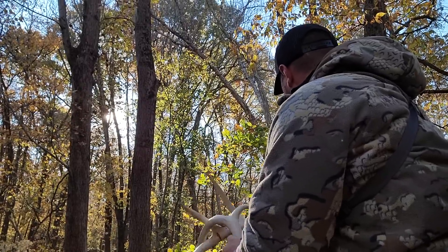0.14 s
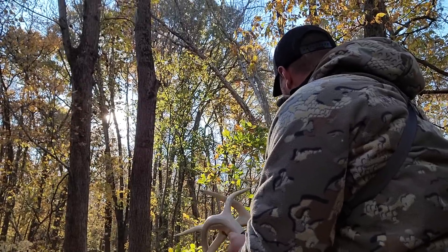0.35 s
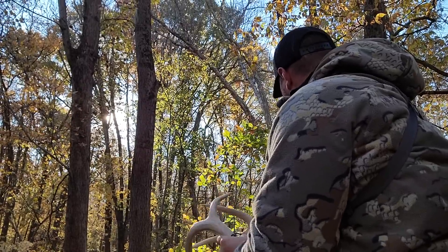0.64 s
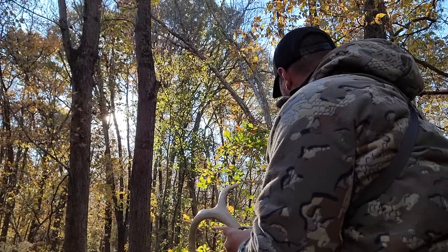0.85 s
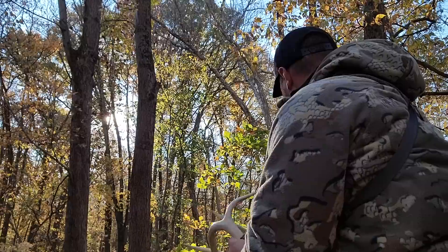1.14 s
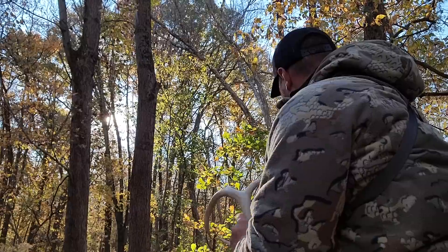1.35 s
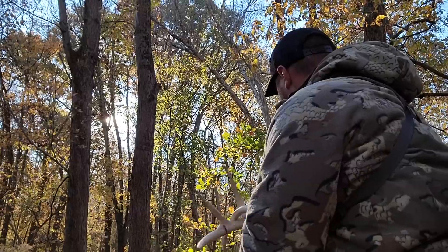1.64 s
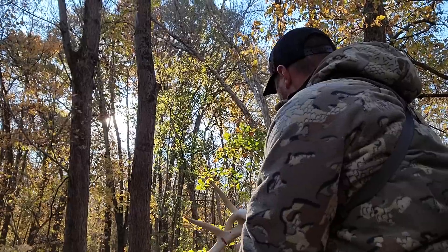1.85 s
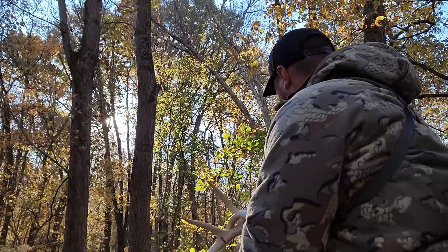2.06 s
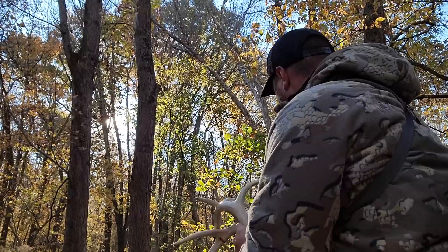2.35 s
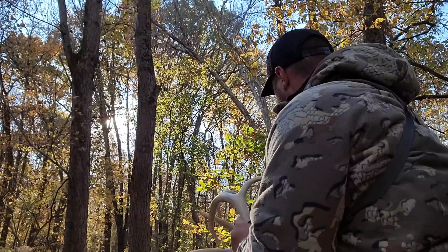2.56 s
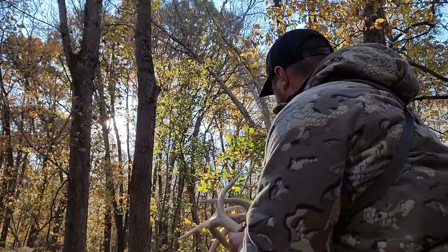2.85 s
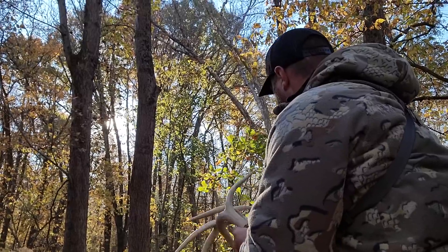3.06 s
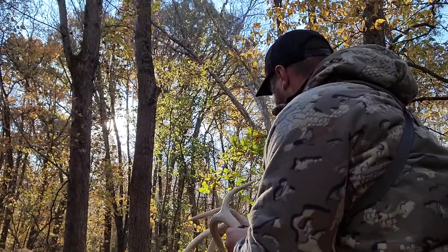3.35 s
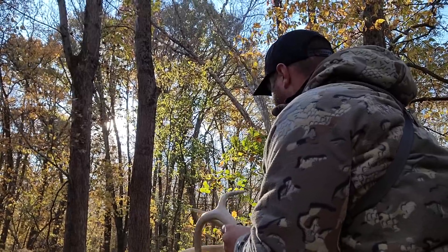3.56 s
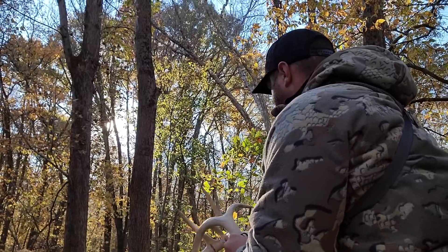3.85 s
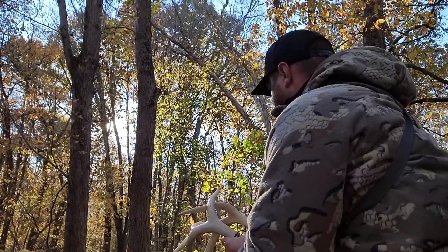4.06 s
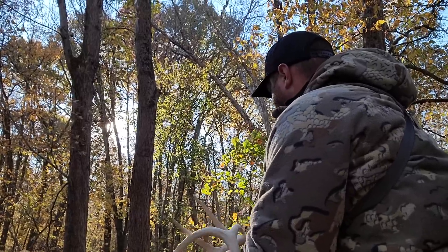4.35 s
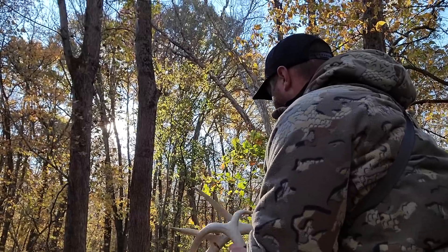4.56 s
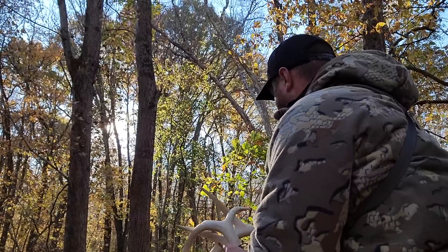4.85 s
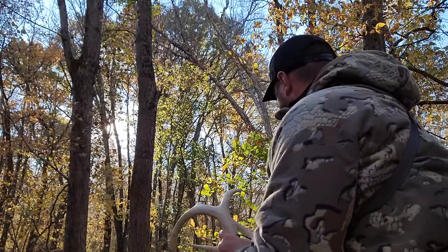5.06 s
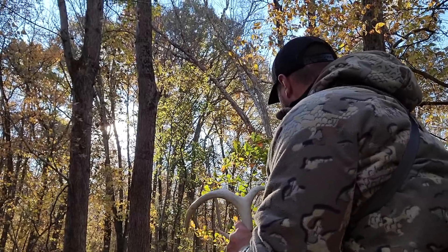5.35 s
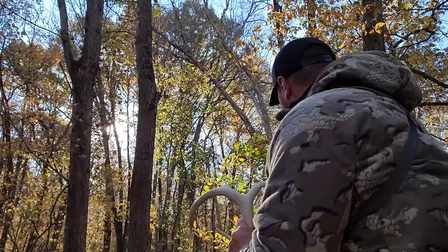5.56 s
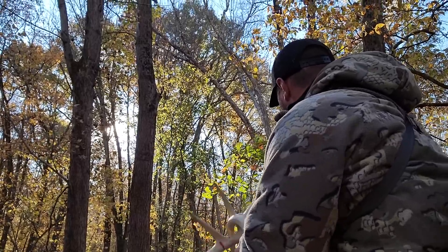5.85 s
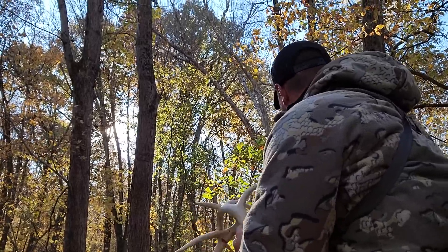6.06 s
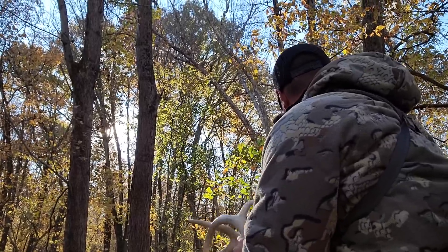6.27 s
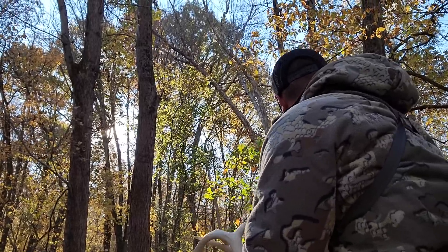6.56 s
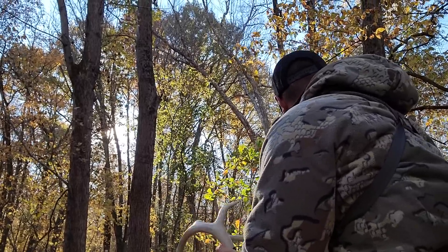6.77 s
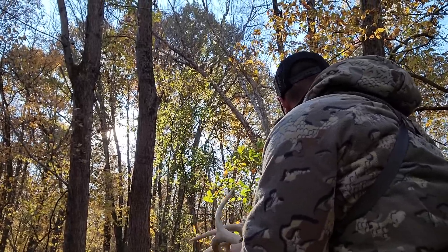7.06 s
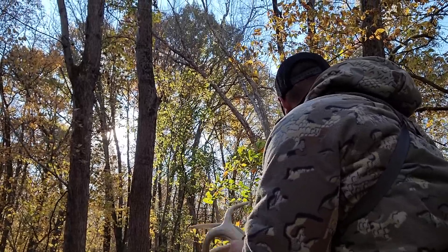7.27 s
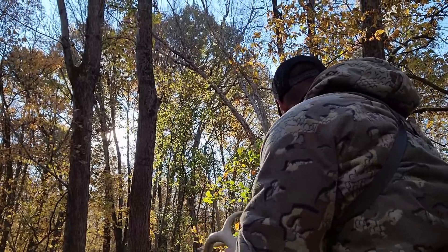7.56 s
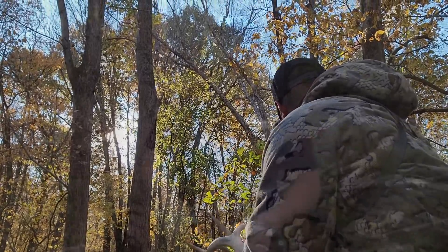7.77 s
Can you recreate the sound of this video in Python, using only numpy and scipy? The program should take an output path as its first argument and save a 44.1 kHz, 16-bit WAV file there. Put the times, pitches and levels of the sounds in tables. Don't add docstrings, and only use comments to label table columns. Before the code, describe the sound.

A pair of hard antlers is rattled about a metre from a small stereo microphone in open woods. Tight clusters of bright cracks, hollow clonks and brief gritty scrapes alternate with pauses holding only faint ticks. The loudest bursts come near the middle-late part and close to the end. Soft leaf hiss, distant low rumble and light wind sit underneath, with a very short diffuse return from the trunks.

```python
import sys
import numpy as np
from scipy import signal
from scipy.fft import rfft, irfft, next_fast_len
from scipy.io import wavfile

SR = 44100
rng = np.random.default_rng(int(sys.argv[2]) if len(sys.argv) > 2 else 0)


def wav_record(signal):
    frames = np.transpose(np.atleast_2d(signal))
    bounded = np.clip(frames, -1, 1)
    quanta = np.round(bounded * 32767).astype(np.int16)
    wavfile.write(sys.argv[1], SR, quanta)


def gain_from_db(level_db):
    decades = np.asarray(level_db, float) / 20
    return 10 ** decades


N = 348478

# f/Hz, level/dB [dB per Hz]
WOOD = [(12, -44), (20, -4), (69, -3), (200, -14.5), (381, -14), (533, -17.5), (1510, -20.5), (3910, -16),
        (5950, -25), (7250, -25), (9330, -38.5), (12700, -34), (14500, -42.5), (17500, -42.5)]
# f/Hz, likeness [-1 to 1]
LIKENESS = [(60, 0.25), (180, -0.015), (550, 0.54), (1650, -0.27), (4970, -0.17), (15000, 0.29)]
# t/s, level/dB
BREEZE = [(0, -59.5), (2.0, -60.5), (3.4, -65), (5.4, -63.5), (6.5, -64.5), (7.9, -58.5)]
# t/s, rise [dB], half length [s]
PUFFS = [
    (3.65, 16.5, 0.042),
    (6.039, 13.5, 0.14),
    (7.441, 6, 0.032),
]

# f/Hz, level/dB, T60 [s]
BEAM_MODES = [(208, -13.5, 0.1), (262, -8, 0.059), (348, -11, 0.11), (410, -6.5, 0.068), (527, -3, 0.083),
              (728.8, -11.5, 0.011), (834, 4.5, 0.0478)]
# f/Hz, level/dB, T60 [s]
TINE_MODES = [(976, -6.5, 0.01652), (1180, -11.5, 0.0597), (1440, -1.5, 0.0307), (1650, -2, 0.01653),
              (1795, -1.5, 0.0264), (2150, -9, 0.023), (2512, -7.5, 0.0299), (2772, -6.5, 0.019),
              (2970, -5.5, 0.022), (3180, -4, 0.00843), (3420, -9.5, 0.035), (3750, -8, 0.0193),
              (4270, -10, 0.01), (4580, -7.5, 0.031), (5000.6, 5, 0.016), (5830, -8, 0.019),
              (6670, 7, 0.0059), (7360, -0.5, 0.00917), (8700, -4, 0.0055), (9170, -8, 0.0045),
              (12400, 1.5, 0.0032), (13800, -4, 0.002)]

# t/s, peak level/dB, strongest ring f/Hz
THUDS = [(0.0, -39.5, 567), (.046, -40.5, 526), (.152, -43, 590), (.177, -40.5, 414), (1.011, -51.5, 396),
         (1.053, -45, 500), (1.474, -31, 826), (1.501, -25, 514), (1.531, -35, 380), (1.558, -36.5, 422),
         (2.143, -33, 790), (2.76, -46.5, 489), (2.805, -34, 930), (2.844, -38.5, 400), (2.915, -43.5, 870),
         (3.064, -36, 837), (3.961, -37, 821), (4.33, -55, 355), (4.37, -47.5, 370), (4.397, -45.5, 438),
         (5.768, -27, 870), (5.795, -27, 350), (5.828, -37.5, 370), (5.855, -41, 550), (5.885, -33, 850),
         (5.99, -38, 736), (6.314, -32, 839), (6.938, -25, 358), (6.99, -41.5, 490), (7.102, -45, 700)]
# t/s, peak level/dB, strongest ring f/Hz, slide fade [s]
SNAPS = [
    (1.056, -6.5, 3625, 0.002),
    (1.4091, -6, 3690, 0.0037),
    (3.631, -13, 3180, .0044),
    (5.71, -38.5, 2150, .0093),
    (5.7216, -3, 2313, 0.002),
    (5.743, -12, 3195, .0082),
]
# t/s, peak level/dB, strongest ring f/Hz, slide fade [s]
CRACKS = [(1.0109, -10, 3420, 0.0031), (1.0304, -19, 3450, 0.014), (1.448, -7, 3750, 0.0042),
          (2.7598, -14.5, 3600, 0.0035), (2.8048, -4, 1650, 0.012), (3.0752, -13, 3220, 0.0041),
          (3.6413, -2.5, 3167, 0.005), (5.7701, -8, 2970, 0.0056), (6.9297, -11.5, 3920, 0.003),
          (6.9378, -3, 1500, 0.012), (6.9772, -7.5, 4180, 0.0034), (6.991, -17.5, 1730, 0.0096),
          (7.2603, -16, 2720, 0.004), (7.284, -28.5, 4190, .0015), (7.5447, -6, 3120, 0.0046),
          (7.598, -31, 3190, 0.004), (6.291, -10.5, 3190, 0.0045), (6.3138, -12.5, 3020, 0.005),
          (7.7867, -17.5, 2870, 0.0043)]
# t/s, peak level/dB, strongest ring f/Hz, slide fade [s]
CLACKS = [(0.1666, -15, 1560, 0.0072), (0.1787, -17.5, 1340, 0.0052), (.192, -24, 1750, 0.0035),
          (1.135, -27.5, 2180, 0.0029), (1.475, -4.5, 2790, 0.0027), (3.0636, -4.5, 3240, 0.0071),
          (3.4194, -12, 2620, 0.0032), (3.937, -5.5, 3260, 0.0031), (3.9613, -6, 4000, 0.0019),
          (4.024, -28, 2230, 0.0037), (4.3984, -29, 2000, 0.0082), (5.7855, -13, 3440, 0.013),
          (5.797, -3, 1760, 0.0022), (5.9895, -19, 2970, 0.0051), (6.324, -8.5, 2680, 0.0098),
          (7.417, -16.5, 1780, 0.0044), (7.5282, -15, 4040, 0.004), (7.8073, -20, 3080, 0.0087)]
# t/s, peak level/dB, strongest ring f/Hz, slide fade [s]
CLONKS = [(.0002, -17.5, 1100, 0.0082), (0.0251, -24, 1060, 0.0071), (.101, -36, 1940, 0.0032),
          (0.1529, -10.5, 2740, 0.0027), (1.0707, -21.5, 2810, 0.0065), (1.4937, -18.5, 3315, 0.0028),
          (2.138, -36, 2700, 0.0089), (2.146, -11, 2870, 0.0092), (2.8327, -13.5, 3100, 0.0037),
          (2.9196, -35, 1060, 0.011), (3.043, -19, 3150, 0.0062), (3.055, -8, 3110, 0.0042),
          (3.6536, -20, 3300, .008), (3.7005, -27.5, 3470, 0.0077), (4.3468, -28, 4120, 0.011),
          (5.854, -25.5, 2970, 0.0046), (5.8847, -27, 1460, 0.0015), (7.008, -10, 1845, 0.00795),
          (7.1642, -32, 1700, 0.011), (7.2164, -35, 1800, 0.016)]
# t/s, peak level/dB, strongest ring f/Hz, slide fade [s]
BUMPS = [(0.035, -37, 1050, 0.0067), (0.0438, -29, 3040, 0.0082), (0.1102, -36.5, 1850, 0.0086),
         (1.534, -34, 2530, .007), (1.5465, -28, 1133, 0.003), (1.588, -28.5, 1470, 0.0041),
         (1.7153, -23.5, 2040, 0.0017), (2.842, -16, 3480, 0.01), (2.955, -36, 1430, 0.0054),
         (3.2619, -28.5, 1950, 0.0057), (3.289, -28, 1650, 0.004), (3.3443, -25, 3630, 0.007),
         (3.438, -27, 1760, 0.0047), (5.8954, -33, 2410, 0.014), (6.0045, -23, 1630, 0.0044),
         (6.0162, -25.5, 1620, 0.0018), (7.0409, -20.5, 1700, 0.0073), (7.101, -22.5, 1640, 0.0034),
         (7.113, -28.5, 1770, 0.0074), (7.1419, -27.5, 1660, 0.0072), (7.1814, -33, 1760, 0.0094),
         (7.209, -38, 1820, .0033), (7.802, -28.5, 2820, 0.0062), (1.501, -5, 3420, 0.0025),
         (4.3711, -18.5, 1856, 0.0048)]
# t/s, peak level/dB, strongest ring f/Hz, slide fade [s]
PINGS = [
    (3.5321, -31, 3560, 0.0061),
    (3.9538, -8.5, 3076, 0.005),
    (4.3306, -11, 2910, 0.0051),
    (7.2473, -7.5, 2960, 0.0036),
    (7.566, -17.5, 3680, 0.0083),
    (7.82, -31, 2870, 0.0021),
]
# level/dB of modes under 2 kHz, level/dB of modes over 5 kHz
CONTACT_DB = [
    (-9, -1),
    (-9, -8.5),
    (-8, -14),
    (-2.5, -12.5),
    (0, -26),
    (-15.5, -11.5),
]
# t/s, peak level/dB, strongest ring f/Hz, slide fade [s]
TAPS = [(0.542, -48, 1940, 0.015), (0.59, -50, 2560, 0.006), (1.1558, -43, 1756, 0.008),
        (2.442, -41, 1630, 0.017), (2.456, -39, 1600, 0.009), (2.912, -33, 1164, 0.0065),
        (2.941, -34.5, 1180.0, 0.012), (2.961, -41.5, 1720, 0.0036), (3.2747, -40, 1720, 0.008),
        (3.328, -35.5, 1730, 0.0058), (3.4783, -43, 1940, 0.0065), (3.4938, -46, 1730, 0.012),
        (3.5167, -37.5, 1255, 0.013), (3.74, -37.5, 2300, 0.014), (4.2586, -47, 1770, 0.024),
        (4.867, -46, 2480, 0.0059), (6.202, -51.5, 2010, 0.026), (6.5807, -45.5, 2540, 0.017),
        (6.741, -54, 4100, 0.0086), (7.128, -34, 1680, 0.0082), (7.448, -53, 3180, 0.0046),
        (7.6565, -45.5, 1210, 0.022), (7.7139, -47, 1800.0, 0.0085), (7.831, -57, 3200, 0.0052)]

# start t/s, length [s], first f/Hz, last f/Hz, rms level/dB
SINGS = [
    (.001, 0.072, 1098, 1095, -42),
    (0.472, 0.067, 1490, 1460, -62.5),
    (1.502, 0.06, 1450, 1480, -47),
    (6.592, 0.047, 2600, 2730, -57.5),
    (6.614, 0.092, 1650, 1650, -56),
    (6.661, 0.069, 2885, 3050, -54.5),
    (6.705, .06, 3320, 3440, -62),
]
# start t/s, length [s], first f/Hz, last f/Hz, rms level/dB
GRINDS = [
    (2.809, 0.05, 1605, 1303, -37),
    (5.803, 0.066, 1390, 1187, -43.5),
    (6.602, 0.1604, 2190, 3190, -58),
    (7.022, 0.15, 1490, 1253, -52),
    (7.179, 0.066, 1483, 1916, -45),
    (7.203, 0.054, 2400, 2960, -46.5),
]
# start t/s, length [s], f/Hz, rms level/dB
HUMS = [
    (1.503, 0.089, 390, -50.5),
    (1.479, 0.077, 273.3, -51.5),
    (2.142, 0.083, 414.4, -54.5),
    (2.82, 0.095, 371, -64),
    (3.055, 0.034, 522, -41),
    (5.794, 0.068, 360, -43.5),
    (6.957, 0.085, 270, -59.5),
]

# t/s, peak level/dB, f/Hz, T60 [s]
CLEAR_RINGS = [(0.1527, -13, 2880, 0.015), (1.011, -27, 2090, 0.029), (1.4086, -24.5, 1750, 0.036),
               (1.4089, -19.5, 2090, 0.024), (1.4134, -27, 3100.0, 0.032), (1.448, -13, 3060, 0.0097),
               (1.474, -20, 1535, 0.053), (1.4752, -9, 2920, 0.0096), (1.501, -13, 3050, 0.033),
               (2.1461, -16, 2490, 0.032), (2.803, -15.5, 2960, 0.059), (2.8036, -21.5, 1297, 0.022),
               (2.805, -17.5, 1550, 0.042), (2.8262, -21, 1760, 0.057), (3.0548, -16.5, 2016, 0.018),
               (3.0615, -24.5, 2470, 0.058), (3.0626, -16.5, 3070, 0.029), (3.072, -20.5, 2360, 0.011),
               (3.0755, -24, 1845, 0.06), (3.6526, -19.5, 2750, 0.041), (3.938, -9.5, 3200, 0.0056),
               (3.953, -10.5, 3190, 0.009), (3.9525, -17, 2840, 0.031), (5.7209, -20.5, 2300, 0.019),
               (5.7214, -19, 3030, 0.017), (5.744, -26.5, 3060, 0.034), (5.769, -20.5, 1863, 0.031),
               (5.769, -21, 1520, 0.024), (5.7964, -14, 1824, 0.024), (6.291, -18, 3116, 0.047),
               (6.2914, -18.5, 2040, 0.028), (6.3133, -12.5, 2730.0, 0.01), (6.316, -18, 3130, 0.033),
               (6.3242, -26.5, 1700, 0.075), (6.324, -15, 2920, 0.027), (6.9366, -16.5, 1407, 0.046),
               (6.9373, -19.5, 2030, 0.019), (6.9378, -12, 2950, 0.026), (6.9417, -25.5, 1755, 0.11),
               (7.0075, -24, 1800, 0.055), (7.2469, -10.5, 2853, 0.032), (7.4167, -27, 3060, 0.029),
               (7.5447, -15.5, 2620, 0.011), (7.546, -21.5, 1307, 0.036), (7.787, -26.5, 2000, 0.04),
               (7.788, -19, 3160, 0.023), (7.8096, -19, 2920, 0.017),
               (0.165, -24, 3700.0, 0.008), (0.1656, -25, 4340, 0.024), (0.1784, -24, 4410, 0.008),
              (1.0556, -9.5, 4100, 0.005), (1.4092, -12.5, 3720, 0.014), (1.4103, -17, 6080, 0.013),
              (1.4492, -21.5, 4320, 0.021), (1.5015, -17, 3420.0, 0.025), (2.1476, -15.5, 3170, 0.01),
              (2.7599, -21.5, 3420.0, 0.03), (2.8038, -18.5, 3650, 0.007), (2.8048, -10, 4000, 0.007),
              (2.8048, -6, 4455, 0.019), (2.8195, -26.5, 3800, 0.017), (2.8204, -24.5, 4340, 0.028),
              (3.0663, -11, 3530, 0.008), (3.4209, -26, 4350, 0.015), (3.6413, -19.5, 6090.0, 0.027),
              (3.6411, -14, 4500, 0.006), (3.6416, -10, 3193, 0.025), (3.6422, -19, 7330, 0.017),
              (3.6433, -10.5, 3785, 0.013), (3.654, -21, 4820, 0.007), (3.9382, -17, 4370, 0.026),
              (3.961, -12, 4580, 0.014), (4.3309, -15.5, 4400, 0.014), (4.331, -20, 3960, 0.024),
              (5.7211, -13.5, 3655, 0.007), (5.7212, -23, 4580, 0.033), (5.7217, -19.5, 3880, 0.007),
              (5.7689, -19, 3770, 0.006), (5.769, -13.5, 4370.0, 0.013), (5.7843, -19, 3630, 0.009),
              (5.796, -19, 4045, 0.017), (5.7966, -13.5, 4560, 0.026), (6.3264, -24, 4650, 0.022),
              (6.337, -25.5, 4620, 0.021), (6.9399, -19, 5000.0, 0.004), (6.9412, -11, 3640.0, 0.016),
              (6.9417, -13, 3380.0, 0.011), (6.942, -6, 4220, 0.008), (6.9546, -18, 3730.0, 0.012),
              (6.978, -14.5, 3550, 0.015), (6.992, -22, 4280, 0.029), (7.2455, -23, 4040, 0.03),
              (7.5277, -21.5, 4120, 0.022), (7.5444, -16, 4400, 0.016), (7.5464, -12, 4670, 0.009),
               (.003, -40, 571, 0.17), (1.012, -45.5, 394, 0.055), (1.504, -27, 1455, .2),
              (1.505, -32.5, 1115, 0.11), (1.546, -33.5, 1130, 0.073), (2.84, -40, 403, 0.19),
              (3.326, -39.5, 1780, 0.059), (3.35, -39, 2480, .05), (3.438, -31.5, 1857, 0.064),
              (4.254, -54.5, 1800, 0.2), (4.333, -49.5, 360, 0.28), (5.77, -37.5, 397, 0.28),
              (5.856, -39.5, 554, 0.082), (7.26, -35.5, 945, 0.087),
               (0.0444, -40, 1500, 0.076), (1.0096, -46, 1624, 0.083), (1.0548, -27, 1255, 0.027),
              (1.4473, -36, 1440.0, 0.033), (1.4746, -12.5, 2670.0, 0.012), (1.4996, -25, 1770, 0.043),
              (2.1439, -37.5, 560, 0.11), (2.1459, -39, 1037, 0.1), (2.8041, -52, 513, 0.05),
              (2.832, -19.5, 3160, 0.024), (2.9189, -37.5, 976, 0.077), (3.0602, -25.5, 834, 0.042),
              (3.0634, -27, 1940, 0.056), (3.3433, -38.5, 1365, 0.072), (3.9359, -29, 1416, 0.057),
              (3.9517, -31.5, 1180.0, 0.047), (4.3711, -37.5, 974, 0.038), (5.7698, -24, 2990.0, 0.036),
              (5.7961, -13.5, 1986, 0.029), (5.8558, -40.5, 1080, 0.04), (5.8846, -40, 2000, 0.028),
              (5.9892, -37.5, 1800, 0.069), (6.9368, -23, 2320, 0.061), (6.978, -29, 1820, 0.023),
              (6.9925, -38, 1030, 0.031), (7.0998, -35.5, 950.0, 0.023), (7.1006, -34, 2000, 0.022),
              (7.1011, -27, 1570, 0.026), (7.1013, -39, 1470, 0.087), (7.5637, -38, 860, 0.052),
              (7.8084, -32, 1740, 0.047), (1.5012, -13, 1580, 0.006), (1.5048, -8, 3150, .009),
              (6.3358, -17, 2910, 0.01)]

# peak f/Hz, peak width [Hz], dip f/Hz, dip width [Hz]
PORT = [(4380, 1450, 5720, 390), (11600, 2900, 11620, 3300)]

RIGHT_LAG_S = 1.7 / SR
LEAD = 700


def rms_one(x):
    return x / np.sqrt(np.mean(x ** 2) + 1e-20)


def at_hz(points, hz):
    point_hz, value = np.transpose(points)
    return np.interp(np.log(hz), np.log(point_hz), value)


def drift(rate_hz):
    r = np.exp(-80 * np.pi * rate_hz / SR)
    slow = signal.lfilter([1], [1, -2 * r, r * r], rng.standard_normal(N // 40 + 2002))[2000:]
    return np.interp(np.arange(N) / 40, np.arange(len(slow)), rms_one(slow))


def band(x, low_hz, high_hz):
    return signal.sosfilt(signal.butter(2, [low_hz, high_hz], "band", fs=SR, output="sos"), x)


def wind_db():
    t = np.arange(N) / SR
    level_db = np.interp(t, *np.transpose(BREEZE))
    for s, rise_db, half_s in PUFFS:
        level_db = level_db + rise_db * np.exp(-((t - s) / half_s) ** 2)
    return level_db


def wood(wood_db=-64.5, quiet_wind_db=-68.5, flutter_db=1.0, left_db=-2):
    size = next_fast_len(N)
    hz = np.maximum(np.arange(size // 2 + 1) * SR / size, 1)
    mid, side = rfft(rng.standard_normal((2, size))) * gain_from_db(at_hz(WOOD, hz))
    alike = np.clip(at_hz(LIKENESS, hz), -1, 1)
    ports = np.sqrt(1 + alike) * mid + np.sqrt(1 - alike) * side * [[1], [-1]]
    windy = 1 / (1 + (hz / 120) ** 4)
    wind = irfft(ports * windy, size)[:, :N]
    leaves = irfft(ports * (1 - windy), size)[:, :N]
    gusts = gain_from_db(wind_db() - quiet_wind_db + flutter_db * drift(10))
    noise = gain_from_db(wood_db + 5) * (wind * gusts + leaves) / np.std(wind + leaves)
    return noise * gain_from_db([[left_db], [0]])


def contacts():
    kinds = zip((SNAPS, CRACKS, CLACKS, CLONKS, BUMPS, PINGS), CONTACT_DB)
    return sorted(tuple(row) + tuple(colour) for rows, colour in kinds for row in rows)


def chatter(size, per_s=2500.0, grit_db=-8.5, uneven_db=2.5):
    mark, height, sign = rng.random((3, size))
    level_db = grit_db - uneven_db * np.log(height + 0.0033)
    return (mark < per_s / SR) * gain_from_db(level_db) * np.sign(sign - 0.5)


def slide(fade_s, graze_db=-17.0, graze_s=0.004, grit_hz=10000):
    t = (np.arange(3200) - LEAD) / SR
    graze = gain_from_db(graze_db) * np.exp(t / graze_s)
    shape = np.where(t < 0, graze, np.exp(-t / np.clip(fade_s, 0.001, 0.02)))
    soft = np.exp(-2 * np.pi * grit_hz / SR)
    touches = signal.lfilter([1 - soft], [1, -soft], chatter(3200) * shape) * gain_from_db(3.0)
    touches[LEAD] = 1.176
    return touches


def strike(out, s, peak_db, modes, colour_db, ring_hz, fade_s, favour_db=8.0):
    spread_db, side_db, grip = 2.0, 3.0, 0.034
    hz, mode_db, t60 = np.tile(np.transpose(modes)[:, :, None], (1, 2, 1))
    port = np.array([[[1.]], [[-1.]]])
    t = np.arange(round(0.7 * t60.max() * SR)) / SR
    age = np.maximum(t - RIGHT_LAG_S * (port < 0), 0)
    chance = rng.standard_normal((4, len(hz), 1))
    hz = hz * (1 + grip * chance[3])
    level_db = mode_db + np.tile(colour_db, (2, 1)) + spread_db * chance[0]
    level_db = level_db + favour_db * np.exp(-(np.log(hz / ring_hz) / 0.0711) ** 2)
    gain = gain_from_db(level_db + port * side_db * chance[1]) * np.sign(chance[2])
    swell = 1 - np.exp(-1.5 * hz * age)
    rung = gain * swell * gain_from_db(-60 * age / t60) * np.sin(2 * np.pi * hz * age)
    hit = signal.fftconvolve(rung.sum(axis=1), slide(fade_s)[None], axes=1)
    i = round(s * SR)
    out[:, i:i + hit.shape[1]] += gain_from_db(peak_db) * hit / np.abs(hit).max(axis=1).mean()


def thuds(fade_s=0.0057, firm_db=-28, leak_db=-39, leak_follows=0.36, leak_hz=780):
    out = np.zeros((2, N + 16384))
    leaks = [(s, leak_db + leak_follows * peak_db, leak_hz) for s, peak_db, *_ in contacts() if peak_db > firm_db]
    for s, peak_db, ring_hz in list(THUDS) + leaks:
        strike(out, s, peak_db, BEAM_MODES, np.zeros((len(BEAM_MODES), 1)), ring_hz, fade_s)
    return band(out[:, LEAD:LEAD + N], 140, 780)


def knocks(dull_per_db=0.09, top_db=4.5, top_follows=0.6):
    out, hz = np.zeros((2, N + 16384)), np.array(TINE_MODES)[:, :1]
    for s, peak_db, ring_hz, fade_s, thick_db, tip_db in contacts():
        tip_db = tip_db + dull_per_db * (peak_db + 8.5)
        colour_db = (hz < 2000) * thick_db + (hz > 5000) * tip_db
        colour_db = colour_db + (hz > 8000) * (top_db + top_follows * tip_db)
        strike(out, s, peak_db, TINE_MODES, colour_db, ring_hz, fade_s)
    for s, peak_db, ring_hz, fade_s in TAPS:
        strike(out, s, peak_db, TINE_MODES, (hz > 5000) * -26.0, ring_hz, fade_s, favour_db=15.5)
    return band(out[:, LEAD:LEAD + N], 558, 19000)


def rubbing(sing_width=0.048, grind_width=0.45, hum_width=0.076):
    out = np.zeros(N)
    rubs = [(*row, sing_width) for row in SINGS] + [(*row, grind_width) for row in GRINDS]
    rubs += [(s, length, hz, hz, level_db, hum_width) for s, length, hz, level_db in HUMS]
    for start, length, first_hz, last_hz, level_db, width in rubs:
        i = round(start * SR)
        grit = chatter(8192, per_s=730.0)[:round(length * SR)]
        rough = signal.sosfilt(signal.butter(2, width * first_hz / 2, fs=SR, output="sos"), grit)
        phase = 2 * np.pi * np.cumsum(np.linspace(first_hz, last_hz, len(grit))) / SR
        press = np.hanning(len(grit)) ** 0.5
        out[i:i + len(grit)] += gain_from_db(level_db) * rms_one(rough * np.sin(phase)) * press
    late = np.interp(np.arange(N) - RIGHT_LAG_S * SR, np.arange(N), out)
    return np.array([out, late])


def rings(swell_s=0.00061):
    out = np.zeros((2, N + SR))
    for s, peak_db, hz, t60 in CLEAR_RINGS:
        t60 = np.clip(t60, 0.006, 0.4)
        t = np.arange(round(t60 * SR)) / SR
        age = np.maximum(t - RIGHT_LAG_S * np.array([[0], [1]]), 0)
        rung = (1 - np.exp(-age / swell_s)) * gain_from_db(-60 * age / t60) * np.sin(2 * np.pi * hz * age)
        i = round(s * SR)
        out[:, i:i + age.shape[1]] += gain_from_db(peak_db) * rung / np.abs(rung).max()
    return out[:, :N]


def scatter(x, level_db=-19.5, t60_s=0.22, sway=2.338):
    t = np.arange(SR // 2) / SR
    tail = rng.standard_normal((2, len(t))) * gain_from_db(-60 * t / t60_s) * (1 - np.exp(-t / 0.004))
    tail = band(tail, 700, 7660)
    tail = gain_from_db(level_db) * tail / np.sqrt((tail ** 2).sum(axis=1, keepdims=True))
    blur = np.sqrt(2) * np.cos(sway * np.array([drift(70), drift(70)]))
    return blur * signal.fftconvolve(x, tail, axes=1)[:, :N]


def scene(tines_left_db=3.6):
    tines = gain_from_db(-2) * knocks() + gain_from_db(-2.5) * rings() + rubbing()
    antlers = tines * gain_from_db([[tines_left_db / 2], [-tines_left_db / 2]]) + thuds()
    return antlers + scatter(antlers) + wood()


def pair(hz, width_hz):
    r = np.exp(-np.pi * width_hz / SR)
    poly = np.array([1, -2 * r * np.cos(2 * np.pi * hz / SR), r * r])
    return poly / poly.sum()


def top_cut(x):
    return signal.sosfilt(signal.butter(12, 16500, fs=SR, output="sos"), x)


def record(dry):
    left, right = dry
    for peak_hz, peak_width_hz, dip_hz, dip_width_hz in PORT:
        right = signal.lfilter(pair(dip_hz, dip_width_hz), pair(peak_hz, peak_width_hz), right)
    clipped = 0.96 * np.clip(np.array([left, right]) / 0.89, -1, 1)
    top = signal.cheby2(14, 70, 17050, fs=SR, output="sos")
    return top_cut(signal.sosfilt(top, clipped))


dry = scene()
out = record(dry)
wav_record(out)
```